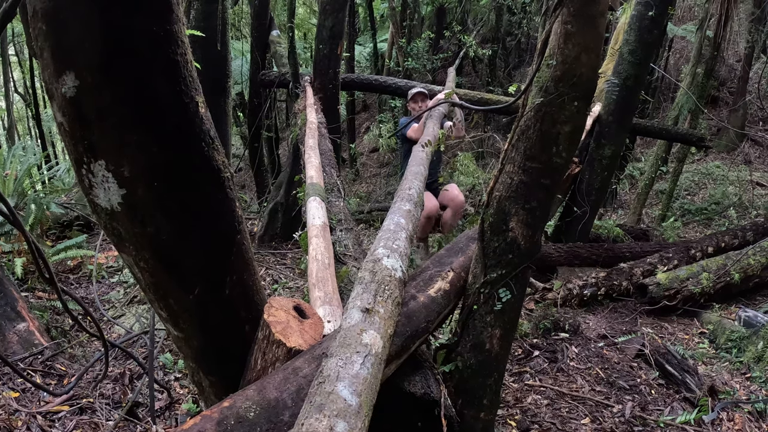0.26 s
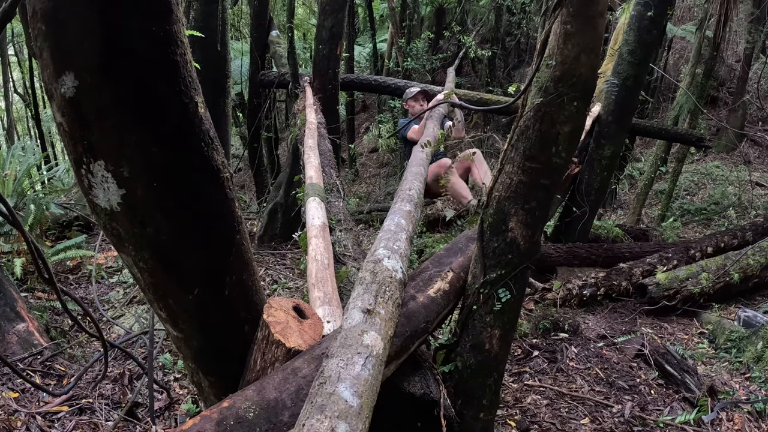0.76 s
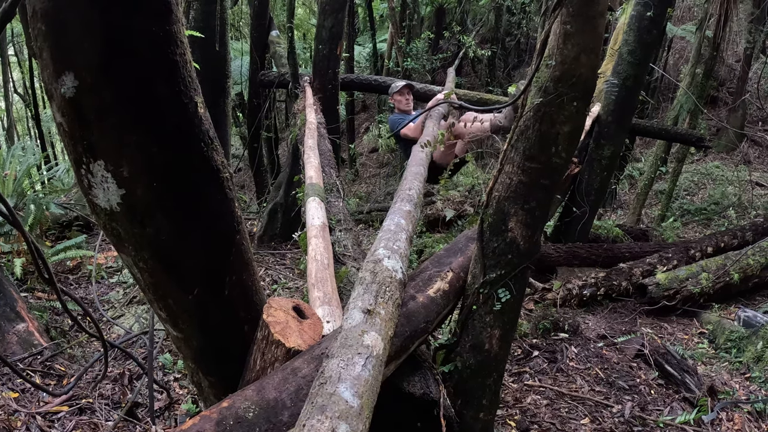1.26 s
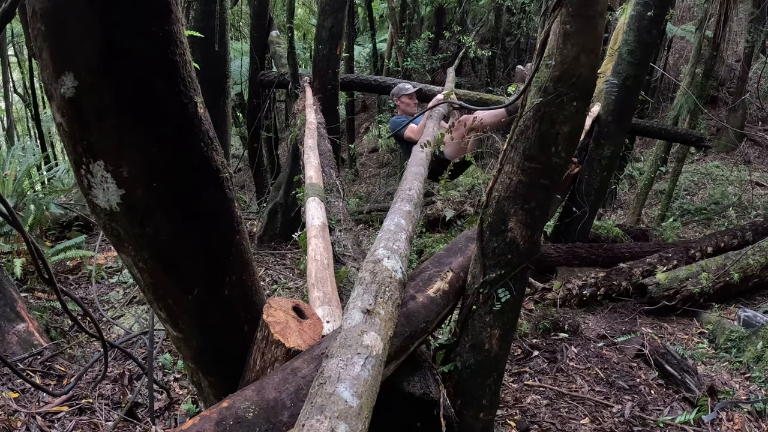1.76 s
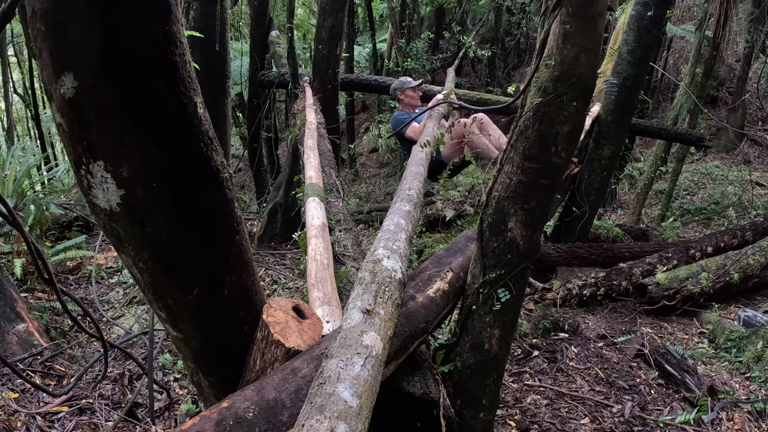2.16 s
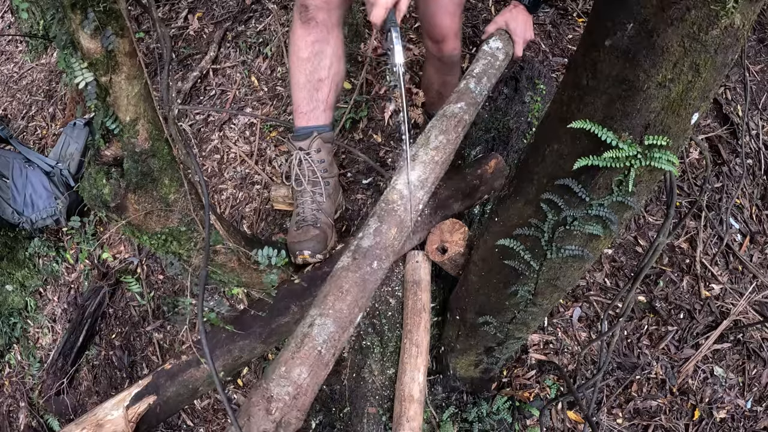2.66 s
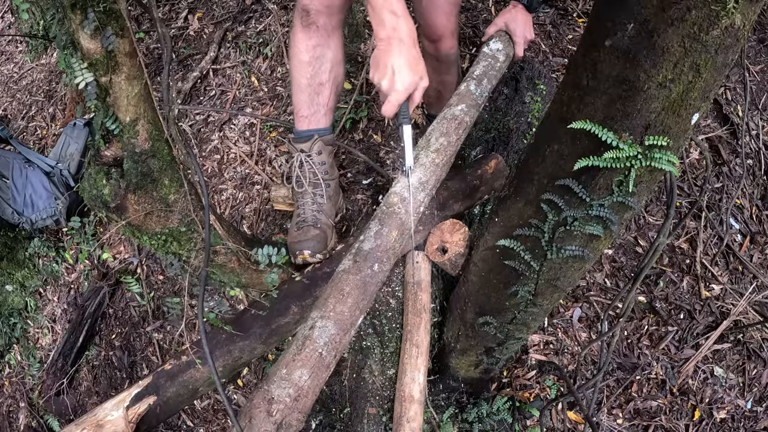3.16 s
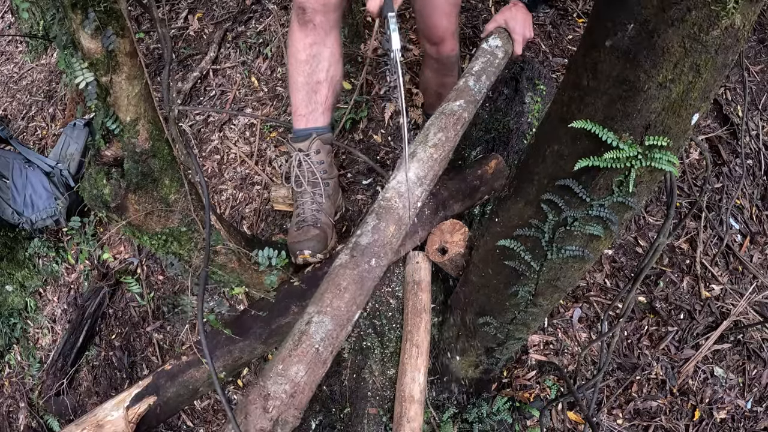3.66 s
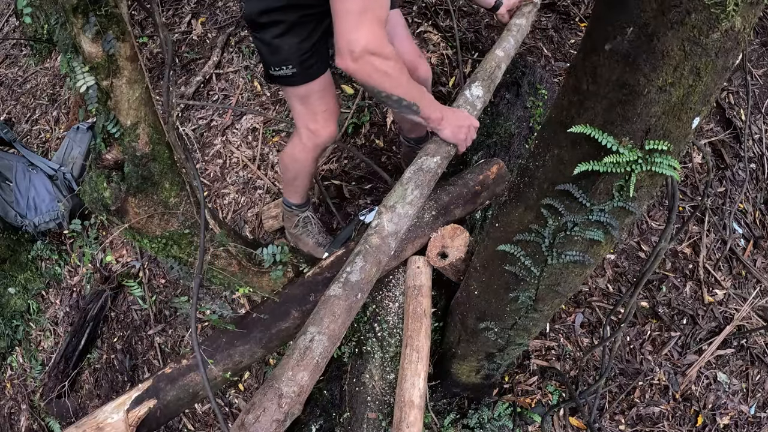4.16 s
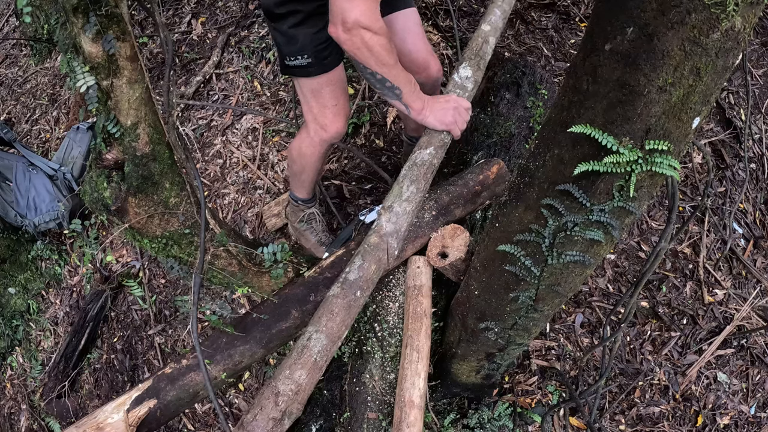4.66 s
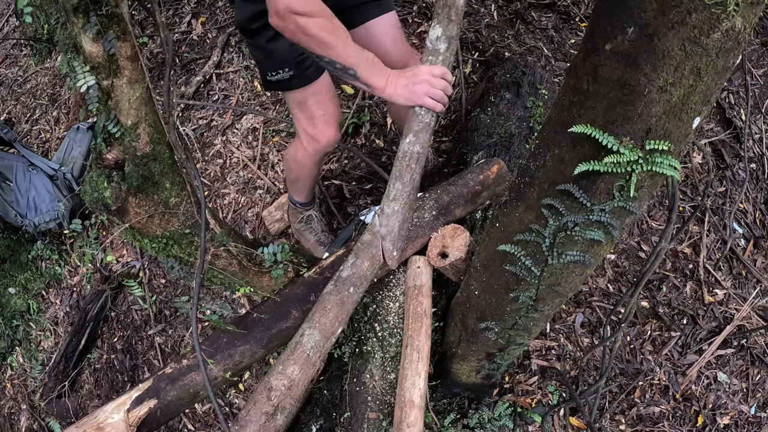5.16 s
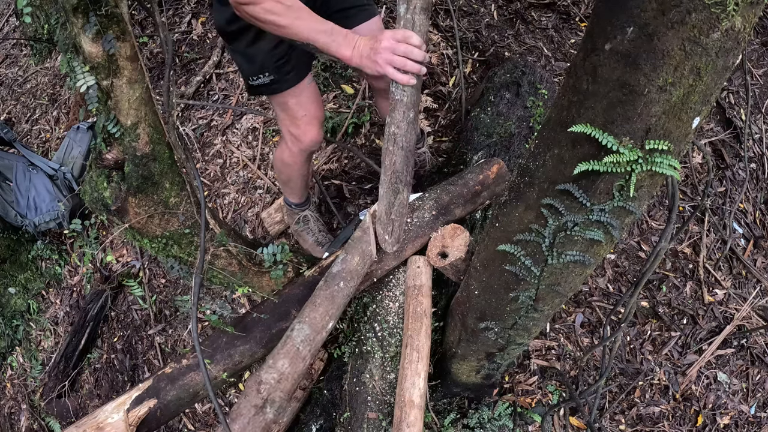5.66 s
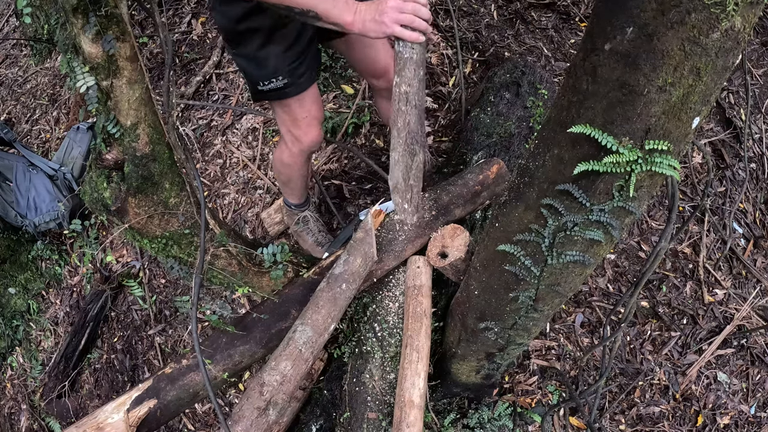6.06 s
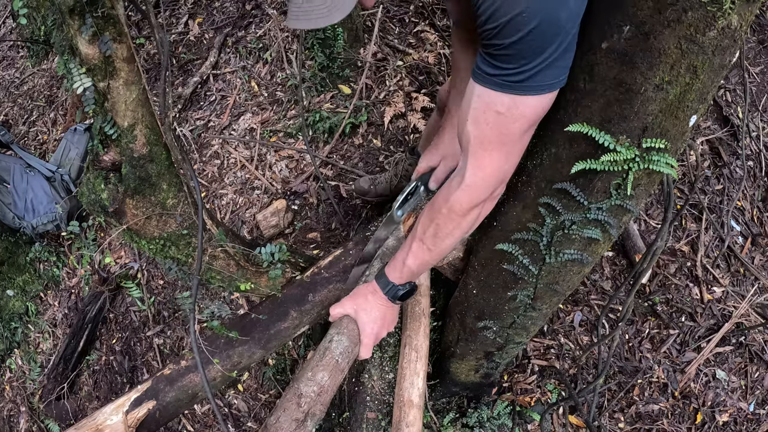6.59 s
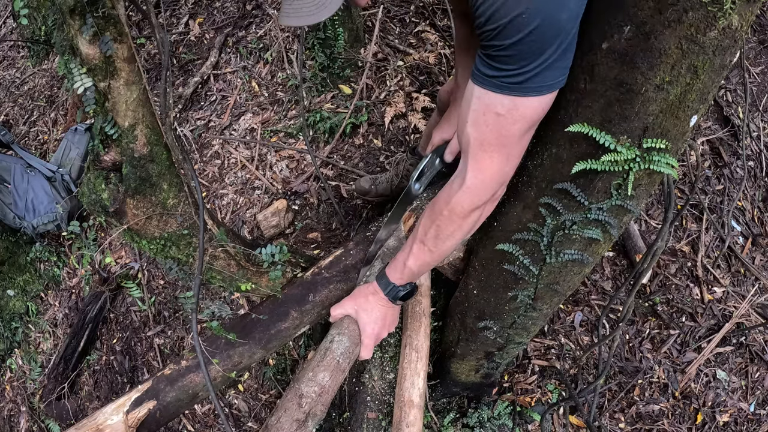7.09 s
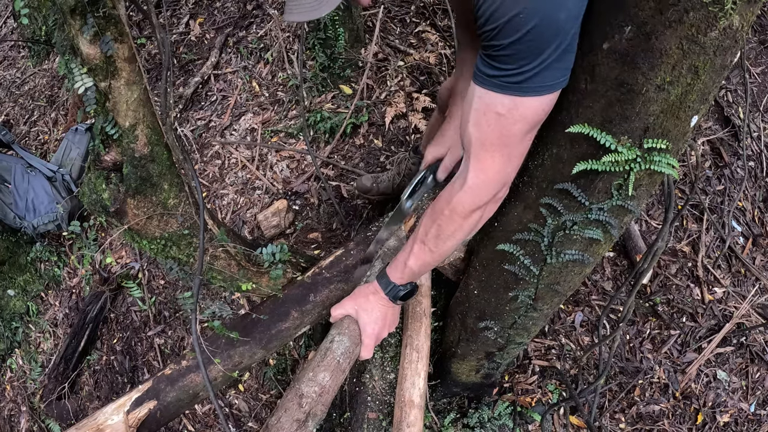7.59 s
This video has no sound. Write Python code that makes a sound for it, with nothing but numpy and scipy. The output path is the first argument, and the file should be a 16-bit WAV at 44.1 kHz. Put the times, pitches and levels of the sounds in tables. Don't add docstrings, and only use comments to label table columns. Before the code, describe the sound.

From 0 to 2.5 s a very quiet forest: leaves rustle and fade, tiny twig ticks sound in the first 0.7 s, a quick chirp comes at 1.3 s, and thin sliding bird whistles follow from 1.75 s. At 2.5 s it cuts hard to close, fast hand sawing, about six strokes a second, rasping and bright with a woody ring and low pole hum, over buffeting wind. At 3.95 s sawing stops; hush and wind remain. A faint snap at 4.3 s and a sharper one at 4.6 s lead to loud dry cracks from 4.7 s, dense splintering and bursts at 5.2-5.5 s, with low thumps near 5.4 s. Quiet follows until a dull thud at 6.1 s. From 6.2 s a second bout begins softly, duller and more hollow, with alternating strokes strengthening to a loud push at 7.7 s. Short, dull echoes from trunks and ground surround everything.

```python
import sys
import numpy as np
from scipy import signal
from scipy.fft import rfft, irfft
from scipy.io import wavfile
from scipy.ndimage import map_coordinates

SR = 44100
rng = np.random.default_rng(int(sys.argv[2]) if len(sys.argv) > 2 else 0)


def dump(signal):
    limited = np.clip(np.atleast_2d(signal).T, -1, 1)
    pcm = np.round(limited * 32767).astype(np.int16)
    wavfile.write(sys.argv[1], SR, pcm)


def nominal_scale(level):
    x = np.asarray(level, float) / 20
    return 10 ** x


N = 345303

SCENE_CHANGES_S = (2.515, 3.952, 6.183)
END_S = 9

# frequency in Hz, level in dB per Hz.
TEETH_TONE = [(88, -17), (150, -1.5), (280, -8.5), (398, -4), (821, -5.5), (905, -1.5), (1560, -5.5),
              (3290, -5), (5680, -11.5), (7620, -9), (12200, -26.5), (14800, -39), (16000, -94)]


def rms_one(x):
    return x / np.sqrt(np.mean(x ** 2) + 1e-20)


def in_time(rows):
    s, *columns = np.transpose(rows)
    return [np.interp(np.arange(N) / SR, s, c) for c in columns]


def between(t0, t1, fade=0.0018):
    t = np.arange(N) / SR
    return np.clip(np.minimum(t - t0, t1 - t) / fade, 0, 1)


def per_scene(levels_db):
    return np.array(levels_db)[np.searchsorted(SCENE_CHANGES_S, np.arange(N) / SR)]


def swells(peaks, rest_db):
    t = np.arange(0, N + 64, 64) / SR
    s, db, rise, fall = np.transpose(peaks)[:, :, None]
    top = np.max(db - np.maximum(rise * (s - t), fall * (t - s)), axis=0)
    return np.maximum(np.interp(np.arange(N) / SR, t, top), rest_db)


def drift(rate):
    knots = rng.standard_normal(5000)
    coarse = np.arange(0, N + 16, 16)
    wander = map_coordinates(knots, [coarse * 2 * rate / SR], order=3)
    return np.interp(np.arange(N), coarse, wander)


def grains(per_s, spread_db):
    sizes = nominal_scale(spread_db * np.minimum(rng.exponential(1, N), 5)) * rng.choice([-1, 1], N)
    return rms_one(sizes * (rng.random(N) < per_s / SR))


def colour(x, points):
    hz, db = np.transpose(points)
    grid = np.linspace(1, SR / 2, 4097)
    log_gain = np.interp(np.log(grid), np.log(hz), db) * np.log(10) / 20
    cepstrum = irfft(log_gain)
    cepstrum[1:4096] *= 2
    cepstrum[4097:] = 0
    kernel = irfft(np.exp(rfft(cepstrum)))
    kernel = kernel.reshape((1,) * (x.ndim - 1) + (-1,))
    return signal.fftconvolve(x, kernel, axes=-1)[..., :N]


def resonate(x, peaks, shift_db=0, sharpen=1):
    out = 0
    for k, (hz, width, db) in enumerate(peaks):
        r = np.exp(-np.pi * sharpen * width / SR)
        a = [1, -2 * r * np.cos(2 * np.pi * hz / SR), r * r]
        push = x * nominal_scale(db + shift_db * drift(6.5)) + 1e-18
        ring = signal.lfilter([(1 - r * r) / 2, 0, (r * r - 1) / 2], a, push)
        out = out + (-1) ** k * ring
    return out


def pair(points, alike):
    mid, side = colour(rng.standard_normal((2, N)), points)
    return rms_one(np.sqrt(1 + alike) * mid + np.sqrt(1 - alike) * side * [[1], [-1]])


def wind():
    # frequency in Hz, level in dB per Hz.
    lump_tone = [(15, -1.5), (30, 0), (50, 1.5), (65, -6), (90, -9.5), (200, -74)]
    flutter_tone = [(45, -32.5), (80, 1), (140, -2.5), (250, -9), (450, -23), (800, -53)]
    # peak in seconds, level in dB, swell time in seconds.
    gusts = [(.07, -48, 0.084), (.7, -57, 0.06), (1.14, -49, 0.05), (1.41, -64, .03), (1.82, -43, 0.051),
             (2.1, -60.5, 0.48), (2.5, -60, 0.078), (2.77, -25, 0.074), (3.11, -24.5, 0.11),
             (3.38, -30, 0.22), (3.7, -32, 0.25), (3.92, -41, 0.071), (4.11, -34, 0.074), (4.35, -48, 0.11),
             (4.59, -41, 0.097), (4.82, -35, 0.15), (4.97, -39, 0.06), (5.16, -35, 0.033),
             (5.25, -33, 0.12), (5.49, -31.5, 0.073), (5.65, -40, .1), (5.8, -27, 0.13),
             (6.15, -24.5, 0.026), (6.5, -37.5, 0.11), (7.12, -42, 0.16), (7.46, -35.5, 0.1),
             (7.66, -40, .2)]
    flurries = [(2.99, -44, .1), (3.15, -38.5, 0.061), (3.6, -42, .1), (3.89, -44, 0.054),
                (4.13, -50, 0.043), (4.77, -41.5, 0.14), (5.4, -30.5, 0.1), (6.1, -30.5, 0.03),
                (6.8, -42, .15), (7.43, -36, 0.062), (7.8, -41, 0.16)]
    lump_rest_db, flutter_rest_db = (-69, -36, -53, -49.5), (-95, -46, -49.5, -49.5)

    levels = []
    for rows, rest_db in [(gusts, lump_rest_db), (flurries, flutter_rest_db)]:
        peaks = [(s, db, 10 / swell, 8.0 / swell) for s, db, swell in rows]
        levels.append(swells(peaks, per_scene(rest_db)))
    lump_db, flutter_db = levels
    lumps = nominal_scale(lump_db + 2. * drift(8)) * pair(lump_tone, .5)
    flutter = nominal_scale(flutter_db + 3. * drift(14)) * pair(flutter_tone, .7)
    return lumps + flutter * between(SCENE_CHANGES_S[0], END_S)


def forest():
    # frequency in Hz, level in dB.
    quiet_tone = [(70, -40), (110, -16), (160, -9), (260, -10), (480, -17), (750, -23.5), (1150, -17.5),
                  (2000, -25), (5000, -28), (8000, -30), (12000, -48.5), (14000, -59)]
    hush_tone = [(150, -30), (250, -2.5), (451, -7), (679, -7.5), (826, -13.5), (1280, -10.5), (2280, -16),
                 (2510, -16), (6290, -20.5), (9310, -27.5), (12500, -46), (15000, -73), (22000, -120)]
    leaf_tone = [(600, -30), (950, -4), (1500, -4), (4500, -4), (9000, -16), (13000, -40), (16000, -70)]
    # time in seconds, level in dB.
    rustle = [
        (0, -59),
        (.2, -60),
        (.45, -65),
        (.65, -68),
        (1.3, -68),
        (1.5, -80),
    ]
    hush_db = (-47.5, -43.5, -50.5, -51.5)

    rustle_db, = in_time(rustle)
    quiet = nominal_scale(-60.5 + .8 * drift(5)) * pair(quiet_tone, .85)
    leaves = nominal_scale(rustle_db + 3. * drift(18)) * pair(leaf_tone, .7)
    right_lean = nominal_scale(np.array([[-1.2], [1.2]]))
    first = (quiet + leaves) * right_lean * between(-1, SCENE_CHANGES_S[0])
    hush = nominal_scale(per_scene(hush_db) + 1. * drift(12.0)) * pair(hush_tone, 0.68)
    return first + hush * between(SCENE_CHANGES_S[0], END_S)


def snaps(events, ring_db, top_hz):
    # frequency in Hz, width in Hz, level in dB.
    split_wood = [(507, 100, 5), (773, 62, 2.5), (974, 36, 9), (1140, 96, 2.5), (1306, 43, 7),
                  (1450, 120, 1), (1710, 210, 5), (1970, 140, -13), (2520, 260, -3), (2720, 290, -1),
                  (3240, 160, -19)]
    snap_s, splinter_s, split_run_s = 0.00057, 0.0023, 0.0089
    echo_s, echo_gain = .0007, -0.11
    splinter_db = -18.5

    t = np.arange(int(.04 * SR)) / SR
    draws = rng.standard_normal((len(events), 2, len(t)))
    crack, knock = np.zeros(N), np.zeros(N)
    band = signal.butter(2, [1800, top_hz], "band", fs=SR, output="sos")
    body = signal.butter(2, 4100, fs=SR, output="sos")
    for (s, db, ring_rel, treble_db), (noise, grit) in zip(events, draws):
        i = round(s * SR)
        shock = (.6 * noise - 1.5 * (t == 0)) * np.exp(-t / snap_s)
        shock = shock + echo_gain * np.interp(t - echo_s, t, shock, left=0)
        splinters = nominal_scale(splinter_db) * .5 * grit ** 3 * np.exp(-t / splinter_s)
        burst = signal.sosfilt(band, shock + splinters)
        low = signal.sosfilt(body, burst)
        burst = low + nominal_scale(1.6 * treble_db - 12.5) * (burst - low)
        crack[i:i + len(t)] += nominal_scale(db + 6.5) * burst / np.abs(burst).max()
        split = grit * np.exp(-t / split_run_s) * np.minimum(t / 0.0013, 1)
        knock[i:i + len(t)] += nominal_scale(db + ring_rel) * split
    crack = signal.sosfilt(signal.butter(4, top_hz, fs=SR, output="sos"), crack)
    ring = resonate(knock, split_wood, shift_db=1.1, sharpen=0.96)
    ring = signal.sosfilt(signal.butter(3, 660, "high", fs=SR, output="sos"), ring)
    return crack + nominal_scale(ring_db) * ring


def ticks():
    # time in seconds, peak in dB, wood ring in dB beside it, treble in dB beside it.
    tick_events = [
        (0.0144, -50, -18, 2),
        (0.1471, -39, -24, 7),
        (0.2438, -51, -14, 0),
        (0.3187, -38, -24, 3),
        (0.3631, -45, -22, -4),
        (.6898, -38, -11, -3),
        (2.8424, -25.5, -30, -8),
        (6.22, -31.5, -30, 9),
        (6.7808, -32, -12, 6),
    ]
    return snaps(tick_events, ring_db=5, top_hz=10000)


def birds():
    # time in seconds, pitch in Hz, level in dB.
    chirp = [
        (1.283, 3150, -57),
        (1.3, 2460, -57),
        (1.318, 2280, -54.5),
        (1.332, 2510, -57),
        (1.345, 2950, -67),
    ]
    # start in seconds, length in seconds, first pitch in Hz,
    # last pitch in Hz, level in dB.
    near_song = [
        (1.754, .08, 4230, 4220, -79),
        (1.788, 0.14, 3830, 3900, -74),
        (1.91, 0.12, 4250, 4350, -65),
        (1.978, 0.2, 3800, 3610, -61.5),
        (2.13, 0.14, 4300, 4260, -65),
        (2.203, 0.15, 3650, 3500, -65),
        (2.387, 0.044, 4350, 4340, -63),
    ]
    far_song = [
        (.28, .16, 4150, 4100, -68),
        (.54, .14, 4300, 4350, -70),
        (.67, .14, 3720, 3650, -65),
        (.5, .2, 4050, 4000, -70),
        (1.845, .12, 4100, 4120, -67),
        (2.36, .06, 3900, 3400, -68),
        (2.41, .07, 4150, 3950, -64),
        (2.47, .05, 3900, 3550, -60),
        (2.43, .08, 4450, 4200, -67),
    ]
    calls = [(chirp, .15, .2)]
    for song, blur in [(near_song, .5), (far_song, .85)]:
        for s, length, hz_0, hz_1, db in song:
            calls.append(([(s, hz_0, db), (s + length, hz_1, db - 9)], 0, blur))

    out = np.zeros(N)
    for rows, overtone, blur in calls:
        hz, db = in_time(rows)
        phase = 2 * np.pi * np.cumsum(hz) / SR
        smear = 1 - blur + blur * drift(70 + 150 * blur ** 2)
        gate = between(rows[0][0], rows[-1][0], fade=0.0078)
        whistle = np.sin(phase) + overtone * np.sin(2 * phase)
        out += 2.9 * nominal_scale(db) * gate * smear * whistle
    return out


def saw(strokes, swing_db, shine_db, teeth, wood, wood_db, blade_db):
    # frequency in Hz, width in Hz, level in dB.
    blade_modes = [(1898, 31, 0), (2520, 50, -4), (3080, 120, -4), (3470, 150, -4.5), (3984, 95, 1),
                   (4270, 90, -8.5), (4750, 56, -4), (5330, 32, 0.5), (5800, 50, -13), (7860, 160, -8),
                   (9400, 130, -4), (10370, 150, -11.5)]
    turn_s, near_s, stop_s = .015, .03, .02

    t, level_db, colours = np.arange(N) / SR, -99, []
    for k, (bite, length, db, wood_rel, fastest) in enumerate(strokes):
        top, end = bite + fastest * length, bite + length
        slowing = .5 * (top + end)
        times = [bite - near_s - turn_s, bite - near_s, bite, .5 * (bite + top), top,
                 slowing, end, end + stop_s, end + stop_s + turn_s]
        level_db = np.maximum(level_db, db + np.interp(t, times, swing_db))
        shine_rel = shine_db[k % 2]
        colours += [(bite, wood_rel, shine_rel), (slowing, wood_rel, shine_rel)]
    wood_rel, bright_rel = in_time(colours)

    chips = grains(11000, spread_db=1.8) * nominal_scale(level_db + 1.3 * drift(30) + 1.8 * drift(180))
    rasp = colour(chips, teeth)
    rasp = rasp * np.sqrt(np.mean(chips ** 2) / np.mean(rasp ** 2))
    shine = signal.sosfilt(signal.butter(2, 5500, "high", fs=SR, output="sos"), rasp)
    rasp = rasp + shine * (nominal_scale(bright_rel + 5.5) - 1)

    shocks = grains(8000, spread_db=3.5) * nominal_scale(level_db)
    pole = resonate(shocks * nominal_scale(0.92 * wood_rel), wood, shift_db=2.0, sharpen=0.65)
    blade = resonate(shocks * nominal_scale(-.6 * wood_rel - 3), blade_modes, shift_db=2.5, sharpen=1.3)
    return rasp + nominal_scale(wood_db) * pole + nominal_scale(blade_db) * blade


def sway(rows):
    peaks = [(s, db, 110, 49) for s, db, _ in rows]
    db = swells(peaks, rest_db=-47)
    _, hz = in_time(rows)
    wander = 1 + .02 * drift(12)
    return 1.38 * nominal_scale(db + 2.27 * drift(8.9)) * np.sin(2 * np.pi * np.cumsum(hz * wander) / SR)


def first_sawing():
    # bite in seconds, length in seconds, level in dB, grip on the wood in dB beside it,
    # share of the stroke at which the blade is fastest (0-1).
    strokes = [
        (2.517, 0.099, -30.5, 1.5, 0.49),
        (2.658, 0.13, -32.5, -2.5, 0.61),
        (2.834, 0.11, -30.5, -6.5, 1),
        (2.996, 0.13, -33, -3, 0.68),
        (3.182, 0.099, -31, -2, 0.89),
        (3.326, 0.13, -31.5, -2.5, .65),
        (3.522, 0.097, -29, -4, 0.9),
        (3.661, 0.14, -31.5, -6.5, 0.6),
        (3.862, 0.09, -29.5, -0.5, 0.82),
    ]
    swing_db = (-32, -28, -7, 0.9, 2, 0, -7, -39, -25)
    # frequency in Hz, width in Hz, level in dB.
    pole_modes = [(220, 88, -6), (370, 27, -1.5), (427, 54, 0), (507, 22, -16), (555, 50, -22),
                  (902, 16, 0), (1025, 22, 4.5), (1190, 18, -3), (1290, 43, 0)]
    # time in seconds, level in dB, pitch in Hz.
    swings = [
        (2.57, -40.5, 124),
        (2.74, -32, 124.9),
        (2.9, -35.5, 124.2),
        (3.43, -33, 123.4),
        (3.57, -33.5, 124.3),
        (3.85, -40.5, 123.6),
    ]
    shine_db = (-7.5, -6)
    sawing = saw(strokes, swing_db, shine_db, TEETH_TONE, pole_modes, wood_db=16.0, blade_db=3.0)
    return sawing + sway(swings)


def breaking():
    # time in
    # seconds, peak in dB, wood ring in dB beside it, # treble in dB beside it.
    fibre_snaps = [(4.3397, -38.5, -21, 5), (4.6345, -18.5, -16, 2), (4.6955, -36.5, 4, -14),
                   (4.7152, -9, -11, 0.5), (4.763, -38, -16, 4), (4.7669, -13, -9, 1),
                   (4.7901, -21, -2.5, 2.5), (4.804, -15, -5.5, 2.5), (4.8295, -28, -7, 8),
                   (4.858, -21.5, -3, 0), (4.863, -28.5, -2, 4), (4.8856, -34, -6, 8),
                   (4.9128, -26, -13, 1), (4.9158, -21, -6.5, 3.5), (4.931, -35, -10, 0),
                   (4.945, -39, -1, 0), (4.9671, -25.5, -3.5, 1.5), (4.983, -35, -6, 0),
                   (5.002, -32, -10, 5), (5.016, -23.5, -8, 3), (5.033, -29, -7, 0), (5.043, -31, -6, -3),
                   (5.0698, -24.5, -6.5, 4), (5.113, -32, -11, -1), (5.1376, -34, -15, 1),
                   (5.1543, -33.5, -24, 7), (5.171, -41, -15, -1), (5.1925, -42, -18, -1)]
    core_bursts = [(5.2, -32.5, -25, 8), (5.219, -15, -31, 5.5), (5.223, -24, -8, 14),
                   (5.2474, -30, -23, -5), (5.2537, -15, -17, 0), (5.2604, -29, -16, 10),
                   (5.2732, -20, -30, -2), (5.2774, -14, -30, 2), (5.2805, -18, -16, -8),
                   (5.2823, -16, -6.5, 3.5), (5.3041, -24, -3, 8), (5.3185, -29, -6, 2),
                   (5.3215, -20, -4.5, 0.5), (5.3248, -29, -11, -6), (5.334, -38, -16, 2),
                   (5.3789, -26.5, -32, 16), (5.395, -40, -12, 2), (5.407, -35, -20, 6),
                   (5.4242, -27, -23, 4), (5.4343, -14, -10, 5), (5.447, -26, -10, 0),
                   (5.455, -17.5, -6, 3.5), (5.4649, -22.5, -3, -5), (5.469, -40, -10, 10),
                   (5.475, -28, -5, -1), (5.7434, -43, 4, -12), (6.1145, -41.5, -20, 8),
                   (6.181, -42, -11, 4)]
    fibres = snaps(fibre_snaps, ring_db=8.5, top_hz=10650)
    return fibres + snaps(core_bursts, ring_db=7.5, top_hz=11100)


def tear():
    # time in seconds, level in dB.
    tearing = [(4.6, -69), (4.71, -73), (4.73, -54), (4.842, -48), (4.89, -49), (5.056, -56.5),
               (5.166, -52), (5.21, -54), (5.23, -43), (5.3, -43.5), (5.345, -47), (5.37, -55), (5.42, -62),
               (5.445, -40), (5.48, -47), (5.5, -61), (5.55, -61)]
    db, = in_time(tearing)
    fibres = colour(grains(4000, spread_db=3.) * nominal_scale(3. * drift(50)), TEETH_TONE)
    return nominal_scale(db + 5.0) * rms_one(fibres) * between(4.6, 6.4, fade=0.044)


def thumps():
    # time in seconds, peak in dB, pitch in Hz.
    jolts = [
        (5.374, -12.5, 101),
        (5.435, -20.5, 69),
        (6.096, -19, 60),
    ]
    t, out = np.arange(N) / SR, 0
    for s, db, hz in jolts:
        turn = np.clip((t - s) * hz, 0, 3)
        out = out + nominal_scale(db - 0.5) * np.sin(2 * np.pi * turn) * np.exp(-1.3 * turn)
    return signal.sosfilt(signal.butter(2, 350, fs=SR, output="sos"), out)


def second_sawing():
    # bite in seconds, length in seconds, level in dB, grip on the wood in dB beside it,
    # share of the stroke at which the blade is fastest (0-1).
    strokes = [
        (6.22, 0.14, -45.5, 1.2, 0.71),
        (6.448, 0.13, -40.5, -9, 0.41),
        (6.64, 0.1, -34.5, -6, 0.64),
        (6.8, 0.11, -38.5, -10, 0.39),
        (6.99, 0.11, -36, -2.1, 0.65),
        (7.141, 0.14, -37.5, -9.5, 0.42),
        (7.336, 0.11, -33, -3.5, 0.86),
        (7.495, 0.13, -35.5, -9.5, 0.44),
        (7.7, 0.074, -30, 0.5, 0.71),
        (7.811, 0.04, -40, -10, 0.44),
    ]
    swing_db = (-36, -18.5, -6, 1.4, 2.5, 2, -5.5, -22, -34)
    # frequency in Hz, level in dB per Hz.
    teeth = [(88, -3), (150, -13), (222, -33), (328, -16), (361, -29), (414, -5.5), (821, -8), (960, -3),
             (2270, -7.5), (4080, -8), (9260, -14), (13700, -31), (16000, -52)]
    # frequency in Hz, width in Hz, level in dB.
    pole_modes = [(139, 12, 8.5), (272, 8.8, 1.5), (322.2, 19, 2), (420, 22, 5.5), (468.5, 8, 7),
                  (542, 47, -2.5), (682, 100, -3.5), (982, 26, 1.5), (1072, 20, 3), (1177, 27, 2.5),
                  (1367, 74, -4.5), (1466, 19, -4.5)]
    # time in seconds, level in dB, pitch in Hz.
    swings = [
        (6.322, -41.5, 103.2),
        (6.6, -38, 91),
        (6.722, -35.5, 117.8),
        (6.885, -32.5, 93.2),
        (7.475, -39, 101.5),
        (7.6, -38, 94.2),
        (7.8, -47, 90),
    ]
    shine_db = (-4, -3)
    sawing = saw(strokes, swing_db, shine_db, teeth, pole_modes, wood_db=19.0, blade_db=8.5)
    return sawing + sway(swings)


def trunks(x):
    t = np.arange(int(.15 * SR)) / SR
    tail = rng.standard_normal((2, len(t))) * nominal_scale(-60 * t / 0.11) * (t > .001)
    tail = signal.sosfilt(signal.butter(1, [500, 7000], "band", fs=SR, output="sos"), tail)
    tail = tail / np.sqrt(np.sum(tail ** 2) / 2)
    return signal.fftconvolve(x[None], tail, axes=-1)[:, :N]


def ports(x, pan_db):
    late = np.r_[np.zeros(47), x[:-47]]
    glint = signal.sosfilt(signal.butter(6, 11300, "high", fs=SR, output="sos"), late)
    glint = glint * drift(250)
    left = signal.lfilter([.38, 1], [1, .38], x) + 1.1 * glint
    right = signal.lfilter([.86, .14], [1], x) - .4 * glint
    return np.array([nominal_scale(pan_db / 2) * left, nominal_scale(-pan_db / 2) * right])


def scene():
    sawing_on, bending_on, sawing_again = SCENE_CHANGES_S
    first_gate = between(sawing_on, bending_on)
    second_gate = between(sawing_again, END_S, fade=0.066)
    edit = between(-1, sawing_again, fade=.0002) + between(sawing_again, END_S, fade=.05)
    out = edit * (wind() + forest())
    # source, gate, echo level in dB, lean to the left in dB
    placed = [(ticks() + birds(), 1, -9, -4),
              (first_sawing(), first_gate, -13, -.4),
              (breaking() + tear() + thumps(), 1, -15, -1.2),
              (second_sawing(), second_gate, -17, .3)]
    for source, gate, wet_db, pan_db in placed:
        out = out + gate * (ports(source, pan_db) + nominal_scale(wet_db) * trunks(source))
    return out


def top_cut(x):
    return signal.sosfilt(signal.butter(12, 16490, fs=SR, output="sos"), x)


def record(dry):
    top = signal.cheby2(12, 70, 16400, fs=SR, output="sos")
    return top_cut(signal.sosfilt(top, dry))


dry = scene()
out = record(dry)
dump(out)
```